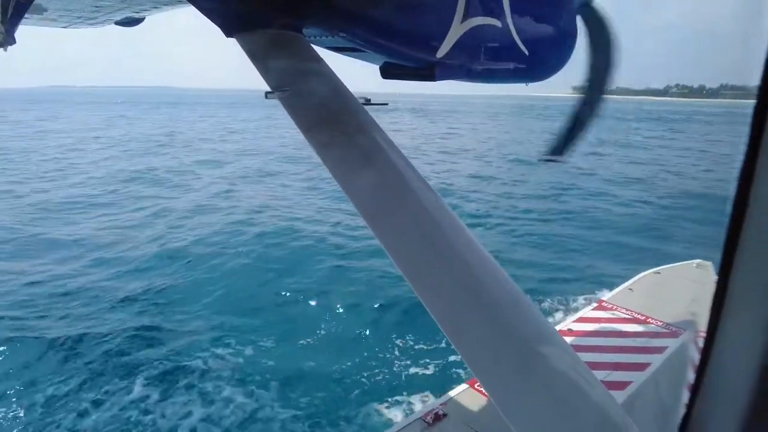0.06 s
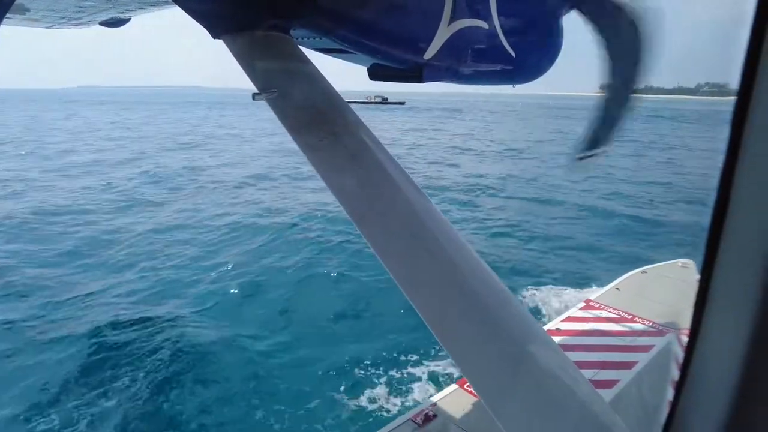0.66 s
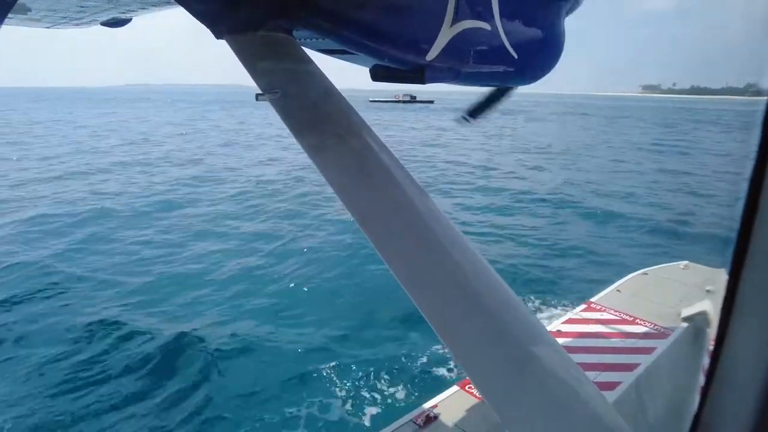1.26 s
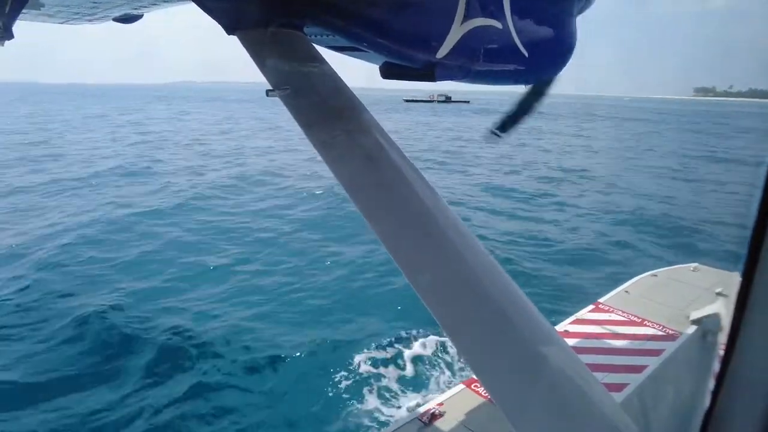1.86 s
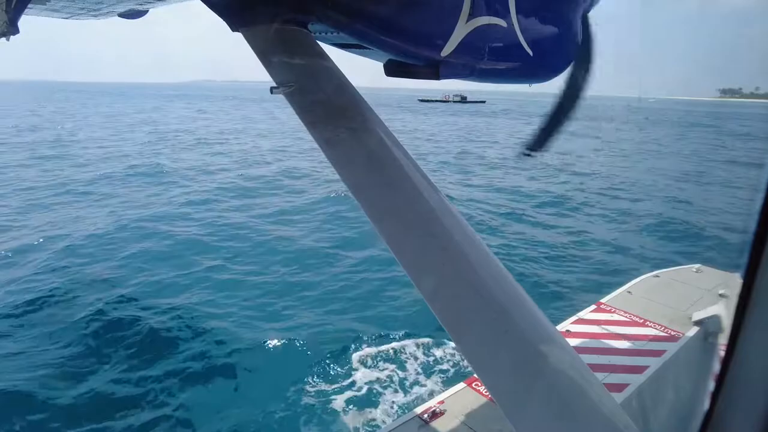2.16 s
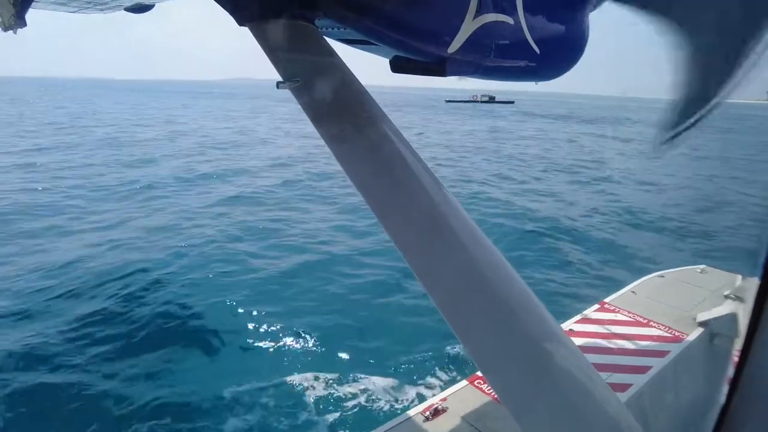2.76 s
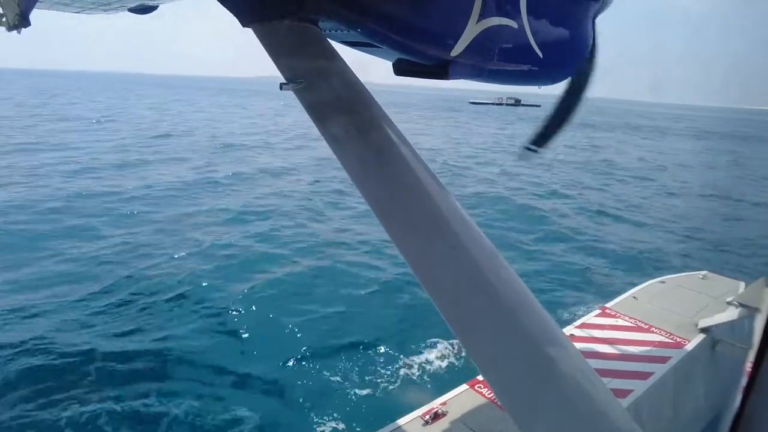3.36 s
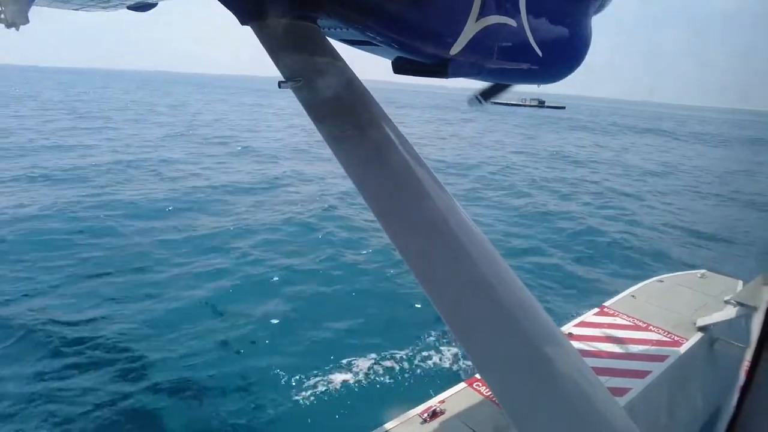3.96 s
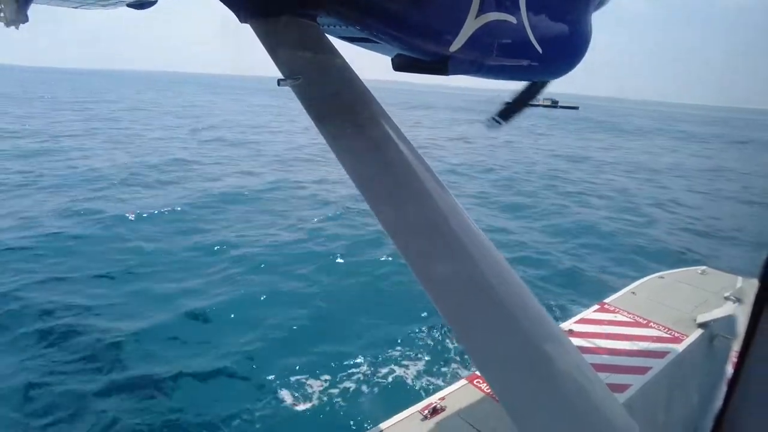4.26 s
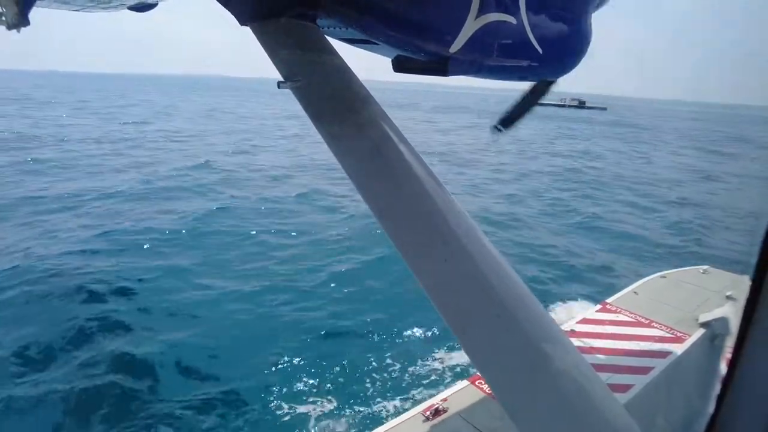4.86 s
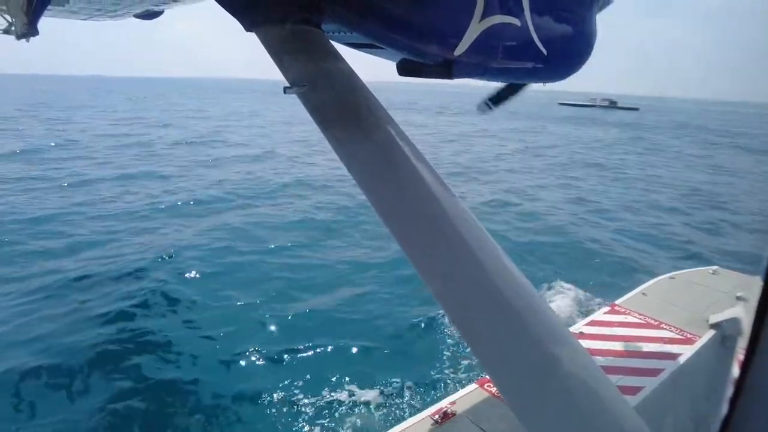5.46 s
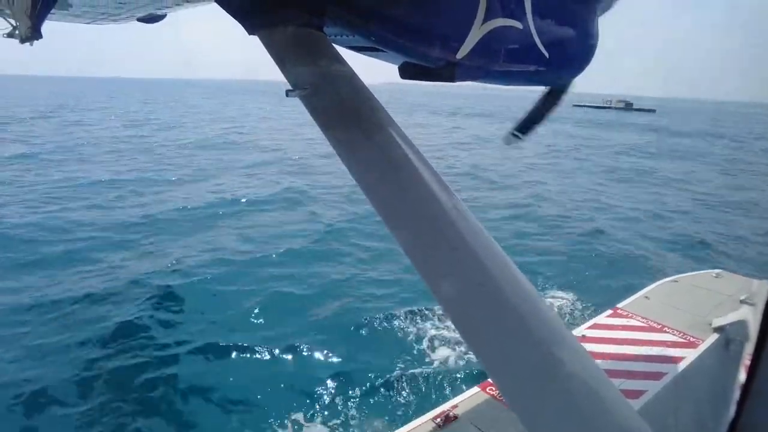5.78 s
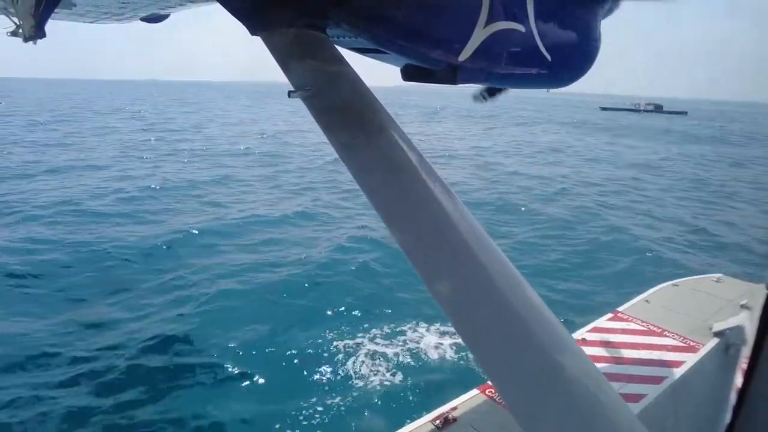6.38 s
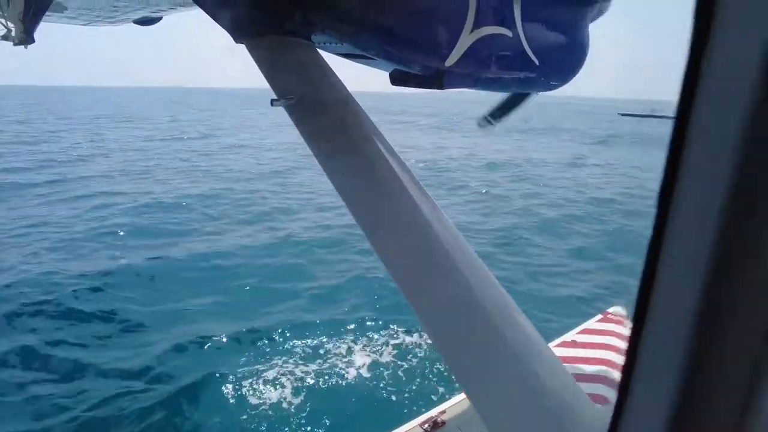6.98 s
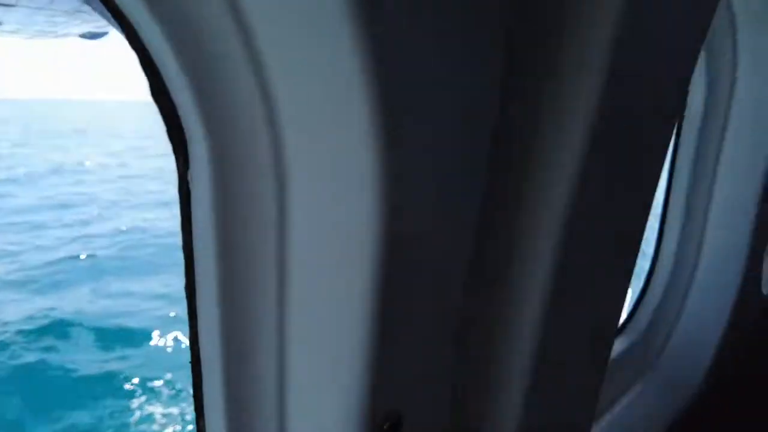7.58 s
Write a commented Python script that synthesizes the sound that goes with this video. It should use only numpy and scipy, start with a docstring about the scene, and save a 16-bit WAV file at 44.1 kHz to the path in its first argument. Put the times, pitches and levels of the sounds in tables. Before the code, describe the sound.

Turboprop engines rumble steadily, heard from a window seat as a small seaplane taxis on water. The near propeller pulses unevenly and gradually slows, its low hum sinking along with a faint, high turbine whine. A muffled roar and light hiss fill the cabin throughout. Later two swells bring faint, deep shudders through the hull, and the other engine's thin whistle edges up just before the end.

```python
"""A propeller throbs and slows over a dull roar, heard inside a taxiing twin turboprop seaplane.
Each passing blade pushes on the cabin, making a tone and its harmonics; turbulent exhaust and wash
excite the cabin's resonances. Over the turbines' hiss the near compressor's whine sinks toward idle,
while the far engine whistles at idle and picks up at the end. Late on, two swells heave the floats."""
import sys
import numpy as np
from scipy import signal
from scipy.fft import rfft, irfft
from scipy.io import wavfile

SR = 44100
rng = np.random.default_rng(int(sys.argv[2]) if len(sys.argv) > 2 else 0)


def log_audio(samples):
    """Write samples as a 16-bit WAV file to the path given in sys.argv[1]."""
    # one column per channel
    frames = np.atleast_2d(samples).T
    # limit to full scale, then quantise
    limited = np.clip(frames, -1, 1)
    pcm = np.round(limited * 32767).astype(np.int16)
    wavfile.write(sys.argv[1], SR, pcm)


N = 336483
TIME = np.arange(N) / SR
BINS = np.fft.rfftfreq(N, 1 / SR)

# speed of the near propeller: (time [s], blade-pass frequency [Hz])
BLADE_RATE = [(0, 74.17), (0.5, 71.8), (1, 71.1), (1.5, 68.27), (2, 65.7), (2.5, 63.3), (3, 61.6),
              (3.5, 60.4), (4, 59.55), (4.5, 56.92), (5, 55.65), (5.5, 55.62), (6, 54.87), (6.5, 54.23),
              (7, 53.83), (7.63, 52.63)]
# air driven past the cabin: (time [s], level [dB])
AIRFLOW = [(0, -35.5), (.45, -31.5), (.9, -34), (1.7, -35), (2.3, -33), (3.3, -31.5), (3.7, -35.5),
           (4.65, -32), (5.15, -37), (6.05, -31.5), (6.45, -33.5), (6.85, -32.5), (7.1, -36.5),
           (7.63, -36.5)]
# brief sags of the propeller's sound: (time [s], half length [s], tone drop [dB], drone drop [dB])
LULL_EVENTS = [(.33, 0.031, 13, 5), (1.68, 0.042, 7, 10), (2.06, 0.031, 15, 4), (2.68, .03, 15, -2.5),
               (3.12, .04, 14, 4), (3.45, .03, 3, 7), (3.96, .05, 2, 8.5), (4.59, 0.047, 14, 0.5),
               (5.45, .04, -3, 3.5), (5.87, 0.059, 0, 10), (6.43, 0.061, 31, 3.5), (7.23, 0.038, 8, 5)]
# brief flares of hiss and whine: (time [s], half length [s], hiss lift [dB], whine lift [dB])
FLARE_EVENTS = [(2.99, .055, 0, 9), (3.88, .07, -1, 12), (7.54, 0.055, 2.5, 14)]


def gain_of(db):
    """Amplitude ratio for a level in decibels."""
    return 10 ** (np.asarray(db) / 20)


def unit_rms(x):
    """Normalisation to a mean power of 1."""
    return x / np.sqrt(np.mean(abs(x) ** 2) + 1e-20)


def curve(rows):
    """Linear interpolation of a time table at every sample."""
    return np.interp(TIME, *np.transpose(rows))


def spectrum_at(rows, hz):
    """Interpolation of a spectrum on a logarithmic frequency axis."""
    row_hz, db = np.transpose(rows)
    return np.interp(np.log(hz + 1), np.log(row_hz + 1), db)


def bumps(rows, column=2):
    """Superposed Gaussian pulses, one an event, with heights from the given column."""
    return sum(row[column] * np.exp(-((TIME - row[0]) / row[1]) ** 2) for row in rows)


def panned(lean_db):
    """Left and right gains for an interaural level difference."""
    return gain_of(np.array([[.5], [-.5]]) * lean_db)


def below(x, hz):
    """Zero-phase low-pass filter: subtracting its output leaves the upper band."""
    return signal.sosfiltfilt(signal.butter(3, hz, fs=SR, output="sos"), x)


def flutter(width_hz):
    """Narrow-band random modulation: complex noise of rms 1, mostly slower than width_hz."""
    size, control_hz = 8192, 1000
    hz = np.fft.fftfreq(size, 1 / control_hz)
    white = rng.standard_normal(size) + 1j * rng.standard_normal(size)
    slow = np.fft.ifft(white / (1 + (hz / width_hz) ** 2))
    return unit_rms(np.interp(TIME, np.arange(size) / control_hz, slow))


def inflow(common, flutter_hz):
    """Uneven air modulates a partial's amplitude and phase: a common part plus flutter, softly bounded."""
    envelope = common + flutter(flutter_hz)
    return unit_rms(envelope / np.sqrt(.5 + abs(envelope) ** 2))


def throb(depth_db, rate_hz):
    """Amplitude modulation of rms 1 whose wandering phase makes the pulsing uneven."""
    beat = np.cos(2 * np.pi * rate_hz * TIME + np.angle(flutter(rate_hz * 0.66)))
    depth = np.tanh(np.log(gain_of(depth_db)))
    return unit_rms(1 + depth * beat)


def blade_angle():
    """Phase as the integral of frequency: one turn for each passing blade of the near propeller."""
    return 2 * np.pi * np.cumsum(curve(BLADE_RATE)) / SR


def airflow_excess_db():
    """Deviation of the airflow's level from its mean."""
    db = curve(AIRFLOW)
    return db - db.mean()


def cabin_db(hz):
    """Modal response of the cabin in dB: a sum of Lorentzian peaks and dips."""
    # cabin resonances: (frequency [Hz], width [Hz], lift [dB])
    modes = [(214, 7.3, 3), (292, 28, 4.5), (361.6, 28, 4), (542, 13, 5), (599, 28, 7), (710, 62, 7),
             (885, 15, 7), (1155, 94, -2), (1281, 38, 6), (1683, 210, 2.5), (1880, 60, -2), (2074, 63, 3.5),
             (2270, 90, 1), (2800, 150, 1)]
    return sum(db / (1 + (2 * (hz - centre) / width) ** 2) for centre, width, db in modes)


def cabin_noise(spectrum, low_hz, high_hz):
    """Standing waves colour turbulence and turn its phase between the ears; mono rms 1 in the band."""
    # left-right coherence: (frequency [Hz], part in phase [ratio], part a quarter turn ahead [ratio])
    coherence_parts = [(65, 0.92, -0.039), (152, 0.96, 0.33), (280, 0.91, -0.1), (358, 0.77, 0.48),
                       (606, 0.69, 0.42), (725, 0.18, 0.51), (855, -0.13, -0.21), (1170, -0.58, -0.28),
                       (1210, 0.62, -0.035), (1970, 0.61, -0.095), (2700, 0.033, 0.19),
                       (4770, -0.31, 0.048), (7500, 0.0049, 0.32), (15000, -0.0018, 0.02)]
    # level difference between the ears: (frequency [Hz], left minus right [dB])
    balance = [(60, 1.5), (110, -0.5), (380, 1), (700, 2), (950, 6), (1300, 0), (1600, -2), (2300, 1),
               (3000, -1), (5000, -.7), (7000, 0.5), (12000, 0), (14500, 0)]
    left, independent = rfft(rng.standard_normal((2, N)))
    hz, in_phase, ahead = np.transpose(coherence_parts)
    coherence = np.interp(BINS, hz, in_phase - 1j * ahead)
    coherence /= np.maximum(abs(coherence), 1)
    right = coherence * left + np.sqrt(np.maximum(1 - abs(coherence) ** 2, 0)) * independent
    colour = gain_of(spectrum_at(spectrum, BINS) + cabin_db(BINS))
    ears = np.array([left, right]) * panned(spectrum_at(balance, BINS)) * colour
    mono_band = ears.mean(0) * (BINS > low_hz) * (BINS < high_hz)
    return irfft(ears, N) / np.std(irfft(mono_band, N))


def drone_db():
    """Envelope of the propeller's harmonics, which gain on the fundamental as it slows."""
    # trend of the drone: (time [s], level [dB])
    trend = [(0, -29.5), (1.9, -29.5), (2.8, -30), (3.9, -29.5), (4.5, -27), (5.8, -29.5), (6.9, -25.5),
             (7.4, -26), (7.63, -31.5)]
    # booms of the drone: (time [s], half length [s], lift [dB])
    booms = [(.56, .06, 8.5), (1.58, 0.034, 6), (2.25, 0.092, 5), (2.64, 0.044, 6.5), (3.04, 0.058, 7),
             (3.36, 0.032, 7), (5.27, 0.13, 5.5), (5.75, .06, 4.5), (6.08, 0.076, 4), (6.76, 0.073, 2)]
    return curve(trend) + bumps(booms) - bumps(LULL_EVENTS, column=3)


def near_propeller(throb_hz=5.5, wander_rad=.25, octave_trim_db=0.73, upper_trim_db=-0.34, sag_hz=4.2):
    """Periodic blade loading radiates a harmonic series that slides across the hull's resonances."""
    # push of the blades on the cabin at the fundamental: (time [s], level [dB])
    blade_push = [(0, -23.5), (.5, -25.5), (.75, -20.5), (1.3, -23), (1.8, -23.5), (2.2, -25), (3.6, -25),
                  (4.3, -25), (4.9, -24), (5.4, -29), (6.25, -27), (6.6, -32), (6.98, -26), (7.2, -34),
                  (7.48, -21), (7.63, -37)]
    # harmonics from the third up: (relative level [dB], flutter width [Hz])
    harmonics = [(-3, 7.2), (-8, 7.7), (-13, 8.5), (-13.5, 13), (-19, 2.7)]
    # transmission through the hull: (frequency [Hz], gain [dB])
    hull = [(150, 0.5), (185, 2), (200, -5), (217, 1), (238, -6.5), (285, -3), (340, -8.5), (520, -4.5)]
    angle, hz = blade_angle(), curve(BLADE_RATE)
    push = gain_of(curve(blade_push) - bumps(LULL_EVENTS)) * throb(depth_db=2.5, rate_hz=throb_hz)
    tone = push * np.cos(angle + wander_rad * flutter(4).real)
    # every blade cuts the same eddy, so the harmonics line up into one slap a blade
    eddy = 1.3 * inflow(common=.4, flutter_hz=5)
    boom = gain_of(octave_trim_db) * throb(depth_db=3, rate_hz=throb_hz)
    drone = boom * inflow(eddy, flutter_hz=6.7) * np.exp(2j * angle)
    for k, (db, flutter_hz) in enumerate(harmonics, 3):
        transmitted = gain_of(upper_trim_db + db + spectrum_at(hull, k * hz))
        drone += transmitted * inflow(eddy, flutter_hz) * np.exp(1j * k * angle)
    # eddies turn with the blades, so the harmonics lie a little flat
    swirl = np.exp(-2j * np.pi * sag_hz * TIME)
    return np.sqrt(2) * (tone * panned(lean_db=-1.2) + gain_of(drone_db()) * (drone * swirl).real)


def roar(chop_depth=0.13, churn_share=0.28, gust_db=1.3):
    """Turbulent exhaust and wash make broadband noise, chopped by each blade and brighter at speed."""
    # spectrum of the turbulence: (frequency [Hz], relative density [dB])
    spectrum = [(15, -35), (36, -5), (68, -1), (83, 1), (98, -0.5), (120, 2.5), (190, 1.5), (240, -4.5),
                (330, -7), (460, -10), (700, -16), (900, -18.5), (1150, -23.5), (5000, -104)]
    # buffeting of the hull, strongest while the propeller sheds speed: (time [s], rumble lift [dB])
    buffet = [(0, -1), (1, -2.5), (2, 0), (3, 1), (4, -0.5), (5, -3.5), (6, -6), (7.63, -0.5)]
    noise = cabin_noise(spectrum, low_hz=280, high_hz=1000)
    bass, body = below(noise, hz=250), below(noise, hz=760)
    flow_db = curve(AIRFLOW) + gust_db * flutter(9).real
    speed, churn_db = curve(BLADE_RATE), drone_db()
    rumble = bass * gain_of(flow_db.mean() + curve(buffet) + churn_share * (churn_db - churn_db.mean()))
    wash = body - bass + (noise - body) * speed / speed.mean()
    chop = unit_rms(1 + chop_depth * np.cos(blade_angle()))
    return rumble + wash * gain_of(flow_db) * chop


def whistle(hz, level_db, width_hz, skirt_db, lean_db, lead_rad):
    """Spectral broadening: turbulence scatters a tone into a skirt that differs at each ear."""
    carrier = np.exp(2j * np.pi * np.cumsum(hz) / SR)
    line = inflow(common=0.42, flutter_hz=width_hz)
    ears = [unit_rms(line * np.exp(1j * turn) + gain_of(skirt_db) * flutter(50))
            for turn in (lead_rad, 0)]
    return np.sqrt(2) * (carrier * np.array(ears)).real * gain_of(level_db) * panned(lean_db)


def near_compressor(idle_hz=4886):
    """The blade tone and two faint harmonics relax exponentially toward idle as the engine winds down."""
    # quick and slow stages of the wind-down: (excess frequency [Hz], time constant [s])
    wind_down = [(514.6, .716), (2099.6, 3.211)]
    # fundamental of the whine: (time [s], level [dB])
    whine = [(0, -51), (.22, -60), (.45, -53), (.82, -60), (1.0, -48), (1.14, -53), (1.32, -47.5),
             (1.62, -55), (1.82, -49.5), (2.3, -53), (2.7, -54), (3.3, -50.5), (4.1, -64), (5.35, -62),
             (6.2, -65), (6.92, -52), (7.15, -66), (7.63, -63)]
    hz = idle_hz + sum(excess * np.exp(-TIME / settle) for excess, settle in wind_down)
    lead = 4.36 + flutter(3).real  # standing waves shift the phase between the ears
    first_db = curve(whine) + bumps(FLARE_EVENTS, column=3)
    first = whistle(hz, first_db, width_hz=13, skirt_db=-4.5, lean_db=1.5, lead_rad=lead)
    second_db = -64 + flutter(2.5).real
    second = whistle(2 * hz, second_db, width_hz=120, skirt_db=-2, lean_db=0, lead_rad=2 * lead)
    third_hz = np.minimum(3 * hz, SR / 2)
    third = whistle(third_hz, level_db=-66, width_hz=35, skirt_db=0, lean_db=0, lead_rad=lead)
    return first + second + third


def turbine_hiss(base_db=-46.5, fade_db_per_s=0.4158, gust_db=1.05, flow_share=0.64, chop_depth=.05):
    """Flow noise of the turbines, lightly chopped, fades as the near engine winds down."""
    # spectrum of the rushing air: (frequency [Hz], relative density [dB])
    spectrum = [(300, -8), (900, 3), (1500, 6.5), (2300, 0), (2900, 2.5), (3500, -1.5), (4400, -0.5),
                (6200, -3), (7200, -6.5), (9000, -7.5), (12000, -12), (14500, -7), (15700, -9)]
    noise = cabin_noise(spectrum, low_hz=2000, high_hz=14000)
    body = below(noise, hz=3300)
    gusty = sum(band * gain_of(gust_db * flutter(12).real) for band in (body, noise - body))
    pick_up_db = 1.5 * (1 + np.tanh((TIME - 7.1) / 0.34 + 1))  # the far engine gains power
    level_db = base_db - fade_db_per_s * TIME + flow_share * airflow_excess_db()
    level_db += bumps(FLARE_EVENTS) + pick_up_db
    return gusty * gain_of(level_db) * (1 + chop_depth * np.cos(blade_angle()))


def far_propeller(level_db=-39):
    """Interference: the idling propeller on the other wing beats weakly against the near one."""
    # speed of the far propeller: (time [s], blade-pass frequency [Hz])
    blade_rate = [(0, 48.8), (1.5, 49.76), (3.2, 51), (5, 51.8), (7.63, 52.35)]
    carrier = np.exp(2j * np.pi * np.cumsum(curve(blade_rate)) / SR)
    tone = inflow(common=0.49, flutter_hz=0.77) * carrier
    octave = inflow(common=0.89, flutter_hz=5.4) * carrier ** 2
    return np.sqrt(2) * gain_of(level_db) * (tone + octave).real


def gearbox(base_db=-57, meshes_per_blade=28.9, resonance_hz=1650, half_width_hz=260):
    """Forced resonance: the gear tone falls with the propeller and rings as it crosses a cabin mode."""
    hz = meshes_per_blade * curve(BLADE_RATE)
    ring = 1 / np.sqrt(1 + ((hz - resonance_hz) / half_width_hz) ** 2)
    return ring * whistle(hz, base_db + cabin_db(hz), width_hz=15, skirt_db=-7.5, lean_db=1, lead_rad=0)


def far_compressor(idle_hz=4893, pick_up_s=7.1, pick_up_hz_per_s=330, wobble_hz=4,
                   flow_share=0.53, grow_db_per_s=0.6, waver_db=2):
    """Blade-tone pitch follows shaft speed, wobbling at idle, then rising; harmonics swell with airflow."""
    # fundamental of the whistle: (time [s], level [dB])
    fundamental = [(0, -71), (2.2, -67), (3.1, -56), (3.85, -71), (4.7, -54), (5.05, -64), (5.55, -57),
                   (6.1, -56.5), (6.9, -54), (7.15, -62), (7.48, -59), (7.54, -45), (7.63, -60)]
    hz = idle_hz + pick_up_hz_per_s * np.maximum(TIME - pick_up_s, 0) + wobble_hz * flutter(0.804).real
    swell_db = flow_share * airflow_excess_db() + grow_db_per_s * (TIME - TIME.mean())
    swell_db += waver_db * flutter(3).real
    first = whistle(hz, curve(fundamental), width_hz=4.74, skirt_db=-12, lean_db=-5.5, lead_rad=2.35)
    second = whistle(2 * hz, swell_db - 68, width_hz=13, skirt_db=-2, lean_db=10, lead_rad=1.3)
    third = whistle(3 * hz, swell_db - 59, width_hz=14, skirt_db=5, lean_db=-6, lead_rad=1.5)
    return first + second + third


def heave(between_swells_db=-40.5):
    """Forced vibration: the hull shudders far down in the bass as the floats meet a swell."""
    # spectrum of the shudder: (frequency [Hz], relative density [dB])
    spectrum = [(3, -30), (9, -14), (18, 0), (24, -20), (34, -29), (70, -62), (300, -100)]
    # swells meeting the floats: (time [s], half length [s], lift [dB])
    swells = [(4.99, 0.11, 18), (7.04, .13, 19.5)]
    return cabin_noise(spectrum, low_hz=8, high_hz=35) * gain_of(between_swells_db + bumps(swells))


def scene():
    """Superposition of all sources at the window seat."""
    propellers = near_propeller() + far_propeller() + gearbox()
    turbines = near_compressor() + far_compressor() + turbine_hiss()
    return propellers + turbines + roar() + heave()


def record(dry):
    """Band limiting: a linear-phase low-pass filter removes the highest treble."""
    edge_hz = 15800
    kernel = signal.firwin(1023, edge_hz, window=("kaiser", 9), fs=SR)
    return signal.oaconvolve(dry, kernel[None], "same")


dry = scene()
out = record(dry)
log_audio(out)
```